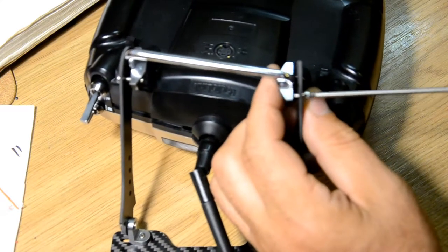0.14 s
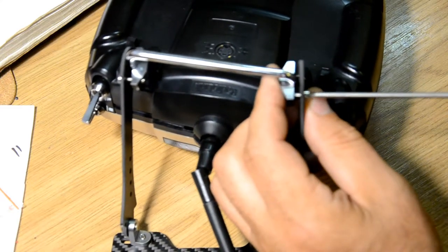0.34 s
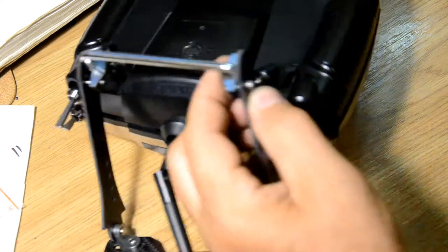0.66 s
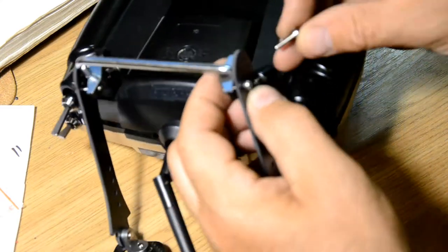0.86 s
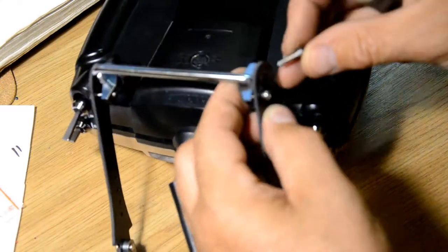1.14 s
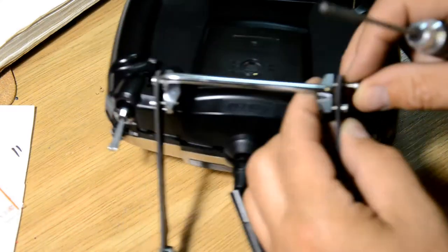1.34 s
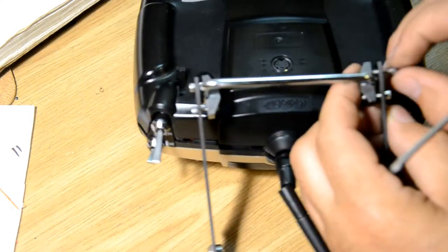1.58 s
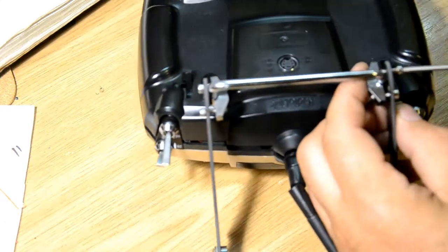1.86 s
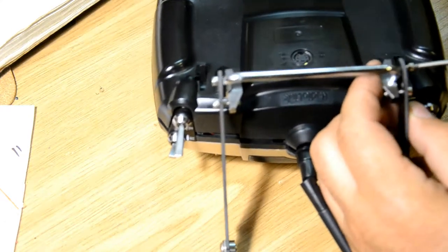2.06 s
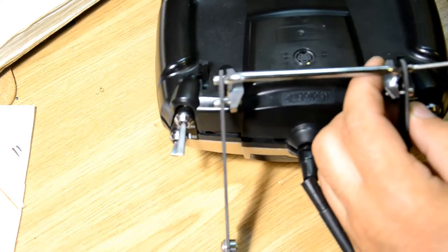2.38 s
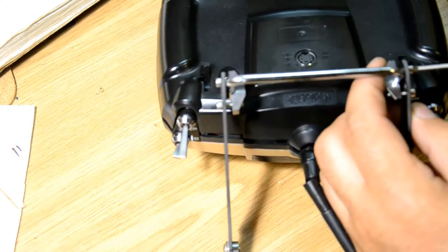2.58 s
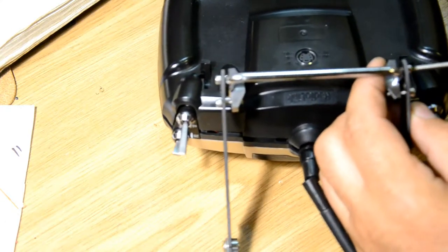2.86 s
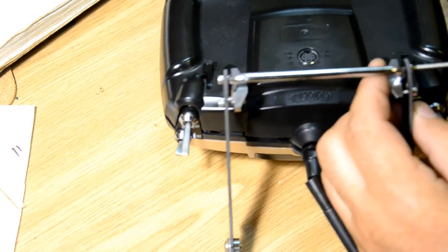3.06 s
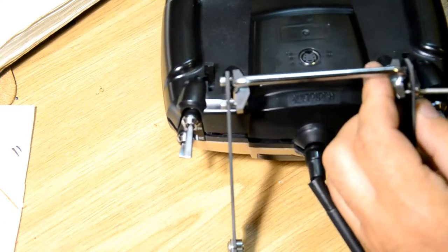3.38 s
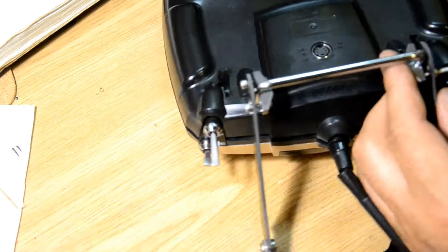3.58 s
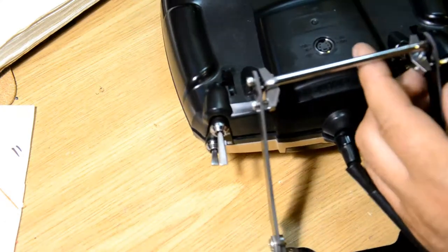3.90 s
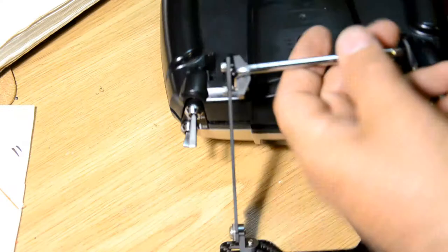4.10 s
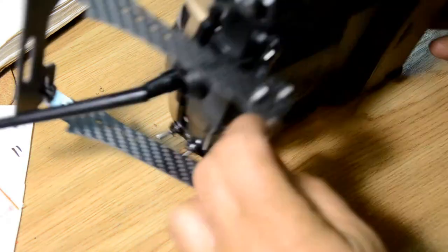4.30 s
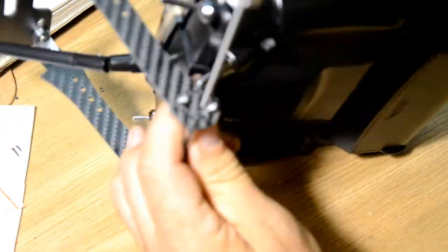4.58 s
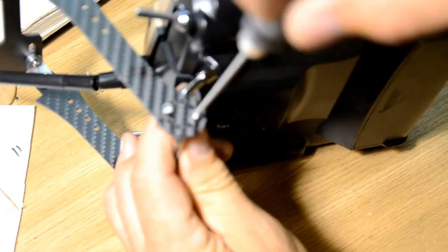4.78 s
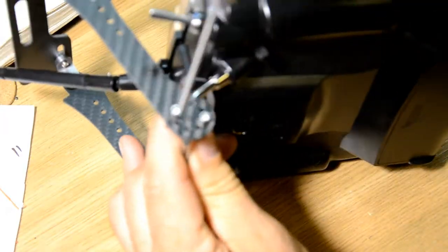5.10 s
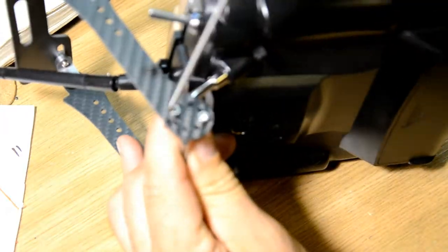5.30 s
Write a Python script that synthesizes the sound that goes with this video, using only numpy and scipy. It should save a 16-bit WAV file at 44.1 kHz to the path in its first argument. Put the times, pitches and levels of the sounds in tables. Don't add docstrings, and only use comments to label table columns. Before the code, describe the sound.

A dull airy room roar with a faint high whine flickers under fast-forwarded tinkering. Hollow plastic knocks, fingertip taps, tiny screw clicks and low desk thuds occur irregularly. After a near pause around three seconds, the case scrapes and bumps hard on the desk just past four, followed by small grazes and ticks, ending with a crisp metallic click. Small indoor space, near microphone, no echo.

```python
import sys
import numpy as np
from scipy import signal
from scipy.fft import rfft, irfft
from scipy.io import wavfile
from scipy.ndimage import uniform_filter1d

SR = 44100
rng = np.random.default_rng(int(sys.argv[2]) if len(sys.argv) > 2 else 0)


def ratio(d):
    e = np.asarray(d, float) / 20
    return 10 ** e


def bounce(signal):
    frames = np.transpose(np.atleast_2d(signal))
    limited = np.clip(frames, -1, 1)
    pcm = np.round(limited * 32767).astype(np.int16)
    wavfile.write(sys.argv[1], SR, pcm)


N = 240073
SLICE = 752

# start [s], level [dB], strongest ring [Hz],
# hardness as edge under level [dB], length [ms].
FIRM_KNOCKS = [(0.116, -34.5, 754, -48, 6), (0.183, -30.5, 783, -26, 9.4), (0.433, -32.5, 1290, -24, 9.2),
               (0.556, -35, 896, -50, 10.7), (1.332, -34.5, 993, -28, 16.3),
               (1.431, -28.5, 1008, -32.5, 12.4), (1.809, -36, 1063, -27.5, 9.2),
               (2.059, -35.5, 694, -33, 13), (2.322, -36, 936, -33, 8), (2.511, -38.5, 954, -36, 5.7),
               (3.5, -36.5, 665.4, -45, 6.34), (3.602, -33, 1750, -24, 8.9), (3.819, -39.5, 845, -34, 15.3),
               (3.943, -28.5, 803, -30, 11.3), (4.056, -36, 946, -37, 16), (4.073, -25, 1034, -45, 10.3),
               (4.107, -24, 610, -25.5, 20.5), (4.12, -15.5, 725, -28, 12.1), (4.143, -31, 924, -20, 8.8),
               (4.156, -46, 830, -11, 10), (4.269, -29, 1423, -26, 7.6), (5.184, -40, 960, -23, 7.3),
               (5.322, -32, 1100, -15.5, 13.7), (5.327, -39, 1036, -24, 8.12)]
# start [s], level [dB], strongest ring [Hz], hardness [dB].
FINGER_TAPS = [(0.315, -40, 970, -35), (0.368, -45, 990, -27), (0.598, -42, 1140, -37),
               (0.786, -42.5, 840, -35), (1.057, -50, 920, -25), (1.251, -44, 993, -41),
               (1.309, -41, 752, -28), (1.414, -44, 1030, -26), (1.633, -42.5, 520, -26),
               (1.848, -43.5, 943, -29), (1.992, -39, 740, -32), (2.019, -38, 982, -34),
               (2.18, -39.5, 1049, -26), (2.369, -43, 834, -29), (2.419, -38, 970, -36),
               (2.631, -47, 934, -41), (2.735, -47, 738, -22), (3.03, -40, 988, -30),
               (3.087, -36.5, 952, -36), (3.486, -44, 762, -44), (3.519, -57, 2400, -24),
               (3.643, -40, 920, -38), (3.768, -40.5, 735, -50), (3.926, -41.5, 990, -33),
               (4.474, -37, 700, -33), (4.525, -47, 1090, -24), (4.69, -39.5, 900, -23.5),
               (5.152, -42, 1010, -32), (5.221, -40.5, 810, -25.5), (5.419, -42, 854, -43)]
# start [s], level [dB], frequency [Hz], length [ms].
WALL_RINGS = [(0.181, -34.5, 786, 15), (0.181, -39, 1606, 14), (0.182, -48, 1280, 12), (0.43, -37, 847, 11),
              (0.431, -33, 1298, 12), (0.431, -35, 1726, 12.4), (1.309, -39, 755, 15),
              (1.427, -34.5, 559, 24), (1.428, -36.5, 1223, 15), (1.431, -35, 996, 13),
              (1.43, -39.5, 1804, 17.5), (3.818, -41.5, 1000, 15), (3.818, -40.5, 496, 16.4),
              (3.939, -27, 995, 17.6), (5.321, -31, 1282, 19), (5.32, -43, 693, 16), (5.32, -38, 820, 15),
              (5.323, -39, 1654, 20), (0.555, -36.5, 760, 9.1), (3.601, -41, 960, 14),
              (3.601, -38.5, 706, 9), (4.071, -28.5, 1098, 13), (4.116, -20.5, 710, 15.6),
              (4.143, -28, 860, 9.3)]
# frequency [Hz], width [Hz], level [dB].
CASE_MODES = [(543, 172, -1.5), (697, 38, 1), (960, 410, -4), (1315, 95, -1), (1650, 370, -7),
              (2040, 370, -18.5), (2210, 980, -17.5)]
# start [s], level [dB], tilt [dB per octave], length [ms].
METAL_TICKS = [(0.182, -48.5, -8, 14), (0.419, -52, 0, 18), (0.434, -36, -14, 4.9), (1.326, -43.5, -9, 31),
               (1.345, -47.5, -10, 17), (1.8045, -49, -3, 17), (2.176, -52.5, -11, 21), (2.24, -49, -23, 8),
               (2.7521, -53, -13, 9.9), (3.4241, -53, -16, 15), (3.942, -47, -9, 16), (4.068, -49, -9, 14),
               (4.1044, -44, -8, 8), (4.118, -37.5, -9, 20), (4.144, -44, -4, 8), (4.2666, -43.5, -16, 7.6),
               (4.469, -42, -13, 15), (4.6902, -33.5, -11, 10.7), (4.9137, -52, -1.5, 14),
               (5.015, -54, -9, 15), (5.218, -53, -5, 11), (5.3207, -23.5, 0, 7), (5.327, -18.5, -2, 4.7)]
# start [s], level [dB].
SCREW_CLICKS = [(0.321, -57), (0.7726, -61), (1.4326, -60), (1.4626, -57), (1.8582, -59), (1.9794, -57),
                (2.0544, -57), (2.1126, -56), (2.3062, -57), (2.37, -59), (2.4404, -59), (2.5336, -63),
                (2.6244, -58), (2.6703, -57), (2.815, -60.5), (3.0194, -60), (3.0844, -57), (3.1494, -58),
                (3.1802, -61), (3.4845, -61), (3.5344, -58), (4.5999, -59), (4.7711, -56), (4.807, -63),
                (4.8494, -59), (4.9501, -57), (5.18, -57)]
# frequency [Hz], width [Hz], level [dB].
STEEL_MODES = [(4950, 57, -17.5), (7420, 110, -21), (8480, 160, -17), (9180, 120, -13), (10300, 140, -20),
               (11700, 240, -20), (13200, 250, -21)]
# start [s], level [dB], frequency [Hz], length [ms].
STEEL_RINGS = [(0.424, -76, 5400, 12), (0.425, -74, 9650, 14), (1.853, -64, 3000, 28),
               (3.178, -69, 4800, 8), (3.18, -79, 5300, 20), (3.482, -63, 4800, 8),
               (3.601, -38.5, 1810, 6.1), (3.941, -64, 9700, 16), (3.942, -65, 10700, 16),
               (3.939, -58, 5262, 25), (3.942, -26.5, 1698, 14), (4.068, -59, 4700, 19),
               (4.068, -62, 5430, 12), (4.068, -68, 8550, 10), (4.265, -38, 1938, 14),
               (4.467, -58.5, 6800, 19), (4.468, -61, 5130, 13), (4.469, -68, 8120, 16),
               (4.68, -66, 5410, 19), (4.686, -55.5, 3210, 15), (4.687, -48, 2045, 20),
               (4.689, -55, 9350, 11), (4.689, -60, 10700, 12), (4.912, -77, 10300, 16),
               (5.01, -72, 5300, 32), (5.011, -60.5, 3120, 16), (5.012, -77, 9400, 24),
               (5.326, -44.5, 10200, 10), (5.3252, -41, 8000, 4.6), (5.3265, -34, 3200, 6.5)]
# start [s], level [dB], ring [Hz], deep push under 130 Hz [dB], length [ms].
DESK_THUDS = [(0.389, -49, 154, -54, 24), (0.55, -48, 206, -54, 17), (0.682, -42.5, 231.5, -66, 14),
              (1.139, -41.5, 145, -52, 20), (1.254, -45, 225, -67, 11), (1.332, -42.5, 238, -54, 16),
              (1.432, -45.5, 288, -66, 15), (1.462, -49, 149, -46.5, 15), (2.06, -46, 305.6, -60, 18),
              (2.319, -46.5, 233, -54, 9.8), (3.03, -47.5, 294, -62, 14), (3.087, -45, 266, -51, 11),
              (3.479, -45, 250, -66, 36), (3.944, -45, 275, -60, 30), (4.052, -40.5, 242, -65, 30),
              (4.073, -28.5, 227, -59, 15), (4.106, -34, 240, -37, 46), (4.121, -17.5, 250, -29.5, 13),
              (4.145, -34, 304, -64, 4.6), (4.171, -42, 244, -76, 22), (4.267, -31.5, 334, -35, 11.4),
              (4.519, -41, 238, -43.5, 8.5), (4.544, -46.5, 246, -48, 39), (4.934, -53, 257, -44.5, 24)]
# start [s], length [s],
# moment of most pressure [0-1], body [dB], grit over body [dB].
DRAG_STROKES = [
    (3.462, 0.051, 0.9, -55, -25),
    (3.509, 0.13, 0, -45, -22),
    (3.608, 0.029, 0.03, -39.5, -9.5),
    (4.04, 0.047, 0.8, -47.5, -17),
    (4.082, 0.03, 0.35, -46, -6),
    (4.129, 0.046, 0.12, -37, -3),
    (4.166, 0.17, 0.18, -47.5, -10),
]
# start [s], level [dB], centre [Hz], width [Hz], length [ms].
SLIPS = [(0.197, -42.5, 990, 400, 26), (0.235, -46, 990, 400, 9.9), (0.416, -59, 3000, 1500, 18),
         (0.441, -65, 2800, 1200, 22), (1.057, -50, 1100, 600, 8.8), (1.308, -73, 6460, 3000, 11),
         (1.355, -61, 2980, 1200, 9), (1.445, -60, 2800, 1200, 14), (1.863, -53, 1900, 1200, 6.7),
         (2.049, -56, 2450, 1200, 14), (2.063, -39, 1200, 900, 8.5), (2.325, -56, 1800, 900, 6.9),
         (2.511, -49, 1490, 1500, 7.5), (2.631, -51.5, 1780, 700, 7), (3.014, -60.5, 2830, 1400, 16),
         (3.029, -40, 1340, 1000, 5.9), (3.179, -70, 4200, 1500, 8), (3.519, -48, 2190, 1800, 4.5),
         (3.533, -61, 2400, 1800, 4.7), (3.557, -59, 2500, 1600, 6.9), (3.602, -46, 800, 400, 11),
         (3.612, -74, 4470, 1500, 10), (3.768, -47, 800, 500, 5.4), (3.9433, -30.5, 1680, 1010, 6.2),
         (3.953, -39.5, 1500, 1200, 7.7), (3.94, -62, 9300, 900, 17), (4.068, -57, 4970, 1500, 7.8),
         (4.11, -57, 8000, 8000, 6), (4.123, -26, 1600, 900, 6.9), (4.135, -51, 3800, 2500, 11),
         (4.1445, -33, 1400, 700, 6.2), (4.158, -47, 2600, 1200, 5.4), (4.188, -56, 2200, 1600, 9.5),
         (4.2, -48, 2200, 1600, 7.9), (4.216, -57, 2200, 1600, 7), (4.232, -56, 2500, 1300, 9.8),
         (4.597, -78, 10000, 3000, 10), (4.872, -62.5, 2770, 1200, 9.1), (5.184, -41, 970, 500, 7.3),
         (5.327, -30, 1130, 400, 5.5)]
# start [s], level [dB], centre [Hz], width [Hz], length [ms].
FAINT_GRAZES = [(0.257, -81, 8000, 7000, 10), (0.32, -53, 1700, 700, 9.1), (0.372, -55, 1690, 700, 18),
                (0.458, -76, 4500, 1500, 8), (0.555, -43, 820, 300, 12), (0.775, -88, 7900, 7000, 8),
                (1.311, -51, 800, 400, 7.7), (1.407, -84, 11500, 2500, 6), (1.57, -83, 8000, 7000, 9.2),
                (1.68, -83, 8000, 7000, 10), (2.02, -46, 1300, 1100, 9.3), (2.16, -87, 8000, 7000, 8),
                (2.35, -79, 8000, 7000, 8), (2.535, -80, 10000, 7000, 8), (2.735, -50, 1400, 1000, 4.5),
                (2.795, -84, 8000, 7000, 8), (2.815, -72, 5000, 2000, 7), (3.5, -50, 2000, 1500, 7.5),
                (3.618, -48, 1800, 1800, 9.8), (3.643, -46, 1100, 1200, 6.5), (3.968, -58, 2600, 1200, 6.3),
                (4.054, -55.5, 3420, 700, 11), (4.183, -79, 9000, 7000, 30), (4.268, -55, 1500, 1400, 7.4),
                (4.29, -79, 11000, 3000, 12), (4.374, -81, 9000, 6000, 9), (4.458, -58, 2800, 1200, 8.9),
                (4.502, -60, 1800, 700, 8.5), (4.52, -57, 2400, 1500, 8), (4.61, -62, 2800, 1200, 8),
                (4.628, -55, 1900, 900, 8), (4.646, -53.5, 1900, 900, 14), (4.668, -44.5, 1100, 600, 15),
                (4.88, -46, 1140, 400, 38), (4.991, -45.5, 1100, 400, 21), (5.03, -52, 1800, 900, 12),
                (5.206, -78, 6000, 6000, 8), (5.255, -65, 2000, 2000, 7), (5.315, -60, 3000, 3000, 6),
                (5.332, -48, 9500, 7000, 3.5)]
# start [s], level [dB], centre [Hz], width [Hz], length [ms].
LOOSE_RATTLES = [
    (3.086, -45.5, 1300, 1410, 6.1),
    (3.499, -39.5, 680, 120, 8.1),
    (4.069, -63, 5400, 1200, 14),
    (4.469, -61, 4930, 900, 15),
    (4.68, -76, 10500, 5000, 9),
    (5.326, -46, 4550, 1800, 8.8),
]
# frequency [Hz], density [dB per Hz].
ROOM_SPECTRUM = [(25, -7.5), (70, -6), (255, -5), (350, -14), (560, -11.5), (680, -11.5), (960, -8),
                 (2280, -19), (2540, -22.5), (3610, -28.5), (5560, -40.5), (9000, -46.5), (13000, -49.5),
                 (15800, -53)]
# frequency [Hz], width [Hz], height [dB].
ROOM_HUMPS = [(126.6, 20, 13.5), (242, 102, 5), (3570, 120, 8.5), (4720, 65, 4.5)]
# time [s], frequency [Hz].
ROAR_CENTRE = [(0, 800), (0.2, 950), (0.4, 1140), (0.55, 760), (2.5, 895), (4.2, 950), (4.5, 1330),
               (4.95, 1200), (5.44, 1120)]
# time [s], level over its usual value [dB].
TRAFFIC_SWELL = [(0.0, 2.5), (0.18, 3), (0.35, 6), (0.86, 3.5), (1.03, 1.5), (1.32, 1), (1.51, 0.8),
                 (2.05, 0.5), (2.36, 0), (3.01, 1), (3.56, -0.2), (3.89, 0.1), (4.12, 3.5), (4.26, 1.5),
                 (4.76, 4), (5.06, 3), (5.44, 3)]


def evened(x):
    return x / np.sqrt(np.mean(x ** 2) + 1e-20)


def add(mix, s, sound):
    part = mix[max(round(s * SR), 0):][:len(sound)]
    part += sound[:len(part)]


def hump(hz, centre_hz, width_hz):
    return 1 / np.sqrt(1 + (2 * (hz - centre_hz) / width_hz) ** 2)


def low_pass(hz, corner_hz, order):
    return 1 / (1 + (hz / corner_hz) ** order)


def high_pass(hz, corner_hz, order):
    return 1 / (1 + (corner_hz / (hz + 1)) ** order)


def burst(colour, db, rise_ms, length_ms, fall_db):
    noise = irfft(colour * np.exp(2j * np.pi * rng.random(len(colour))))
    ms = np.arange(len(noise)) * 1000 / SR
    rise, length = np.clip(rise_ms, .3, 20), np.clip(length_ms, 4, 40)
    fade_in = np.sin(np.pi / 2 * np.clip(ms / rise, 0, 1)) ** 2
    decay = ratio(-fall_db * np.clip(ms - rise, 0, None) / length)
    fade_out = np.cos(np.pi / 2 * np.clip((ms - rise - 0.13 * length) / (1.2 * length), 0, 1)) ** 1.6
    shape = fade_in * decay * fade_out
    lumps = evened(np.convolve(rng.standard_normal(len(noise)), np.hanning(160), "same"))
    sound = noise * shape * ratio(1.5 * lumps)
    return ratio(db) * sound * np.sqrt(np.sum(shape ** 2) / np.sum(sound ** 2))


def rings(table):
    twin_share, twin_apart = 0.1, 0.04
    out = np.zeros(N)
    for s, db, ring_hz, length in table:
        t = np.arange(round(length * SR / 1000)) / SR
        fade = np.sin(np.pi * (t / t[-1]) ** 0.84) ** 1.97
        turns = ring_hz * t + rng.random()
        mode = np.sin(2 * np.pi * turns)
        twin = np.sin(2 * np.pi * (turns + twin_apart * ring_hz * t))
        add(out, s, ratio(db) * fade * (mode + twin_share * twin))
    return out


def case_colour(hz):
    return np.sqrt(sum((ratio(db) * hump(hz, f, w) ** 2) ** 2 for f, w, db in CASE_MODES))


def knocks():
    usual_hard_db, tap_ms, clear_hz = -30, 13, 14
    depth_per_soft, dull_per_soft, ring_per_soft = 0.27, 0.39, 0.22
    out, hz = np.zeros(N), np.fft.rfftfreq(4096, 1 / SR)
    body, edge = case_colour(hz), hump(hz, 3140, 2400) ** 3
    for s, db, ring_hz, hard_db, length in FIRM_KNOCKS + [(*row, tap_ms) for row in FINGER_TAPS]:
        soft = usual_hard_db - hard_db
        depth_db = depth_per_soft * soft * low_pass(hz, 720, 8)
        dull_db = dull_per_soft * soft * high_pass(hz, 1300, 6)
        rise = .7 * length
        sound = burst(hump(hz, ring_hz, clear_hz) ** 2, db - 14 + ring_per_soft * soft, rise, length, 6.7)
        sound += burst(body * ratio(depth_db - dull_db), db - 8.5, rise, length, 1.7)
        sound += burst(edge, db + hard_db, rise, length, 0.89)
        add(out, s - .58 * rise / 1000, sound)
    return out + rings(WALL_RINGS)


def ticks():
    click_tilt_db, click_ms = -7.5, 18
    tick_sizzle_db, click_sizzle_db = -1, 3
    out, hz = np.zeros(N), np.fft.rfftfreq(4096, 1 / SR)
    clear = [(*row, tick_sizzle_db) for row in METAL_TICKS]
    faint = [(*row, click_tilt_db, click_ms, click_sizzle_db) for row in SCREW_CLICKS]
    for s, db, tilt_db, length, sizzle_db in clear + faint:
        rise = 0.29 * length
        fizz = ratio(tilt_db * np.log2((hz + 1) / 8000)) * high_pass(hz, 4300, 8)
        fizz *= np.where(hz > 13000, ratio(sizzle_db - 0.14 * (db + 43)), 1)
        steel = sum(ratio(level + 3.5 * rng.standard_normal()) * hump(hz, f, w) ** 2
                    for f, w, level in STEEL_MODES)
        add(out, s - 0.42 * rise / 1000, burst(fizz * (1 + 10.0 * steel), db - 19.0, rise, length, 7.2))
    return out + rings(STEEL_RINGS)


def thuds():
    rise = 7.83
    out, hz = np.zeros(N), np.fft.rfftfreq(4096, 1 / SR)
    push_colour = hump(hz, 90.5, 40) ** 2 * high_pass(hz, 60, 6)
    for s, db, ring_hz, deep_db, length in DESK_THUDS:
        boom = burst(hump(hz, ring_hz, 30) ** 2, db - 2.5, rise, length, 18.0)
        push = burst(push_colour, deep_db - 2.0, 1.48 * rise, length, 7.0)
        add(out, s - rise / 2000, boom + push)
    return out


def drags():
    start_db, end_db, grit_swing = -1.5, -18.5, 1.07
    count, slips_per_s = 8192, 3500
    out, hz = np.zeros(N), np.fft.rfftfreq(count, 1 / SR)
    grit_colour = hump(hz, 2650, 1500) ** 3 * low_pass(hz, 3500, 4)
    for s, length, top, body_db, grit_db in DRAG_STROKES:
        share = np.linspace(0, 1, round(length * SR))
        press_db = np.interp(share, [0, np.clip(top, .02, .98), 1], [start_db, 0, end_db])
        force = ratio(3.3 * np.minimum(rng.exponential(1, count), 4)) * rng.choice([-1, 1], count)
        slips = rfft(force * (rng.random(count) < slips_per_s / SR))
        grit = evened(irfft(slips * grit_colour))[:len(share)]
        body = evened(irfft(slips * case_colour(hz)))[:len(share)]
        sound = grit * ratio(grit_db + grit_swing * press_db) + body * ratio(press_db - 3.0)
        add(out, s, ratio(body_db) * sound * signal.windows.tukey(len(share), .25))
    return out


def snaps():
    out, hz = np.zeros(N), np.fft.rfftfreq(4096, 1 / SR)
    for table, rise in [(SLIPS, 0.12), (FAINT_GRAZES, 0.46), (LOOSE_RATTLES, 0.12)]:
        for s, db, centre_hz, width_hz, length in table:
            add(out, s, burst(hump(hz, centre_hz, width_hz) ** 3, db, rise * length, length, 7.5))
    return out


def room_level(hz, t, flicker):
    f, level_db = np.transpose(ROOM_SPECTRUM)
    db = np.interp(np.log(hz + 1), np.log(f + 1), level_db)
    db = db + sum(height * hump(hz, c, w) ** 2 for c, w, height in ROOM_HUMPS)
    swell = np.interp(t, *np.transpose(TRAFFIC_SWELL))
    rustle, hum, scrape = 2 + swell, -2.5 + 0.041 * swell, -5.5 + 0.16 * swell
    low, high, top = low_pass(hz, 400, 6), high_pass(hz, 2500, 6), low_pass(hz, 6000, 4)
    db = db + low * hum + (1 - low) * (1 - high) * rustle + high * top * scrape
    roar_hz = np.interp(t, *np.transpose(ROAR_CENTRE))
    db = db + (2.0 + 0.54 * swell) * hump(hz, roar_hz, 510) ** 2
    db = db + 15.5 * hump(t, 2.02, 0.29) * hump(hz, 53, 25) ** 2
    return db + (.5 + .7 * top) * flicker[:, :1] + .5 * high * top * flicker[:, 1:]


def whine(flicker):
    whine_hz, whine_db, flicker_db = 15703, -84, 2.5
    turns = whine_hz * np.arange(2 * SLICE) / SR + rng.random((len(flicker), 1))
    return ratio(whine_db + flicker_db * flicker[:, 1:]) * np.sin(2 * np.pi * turns)


def air():
    frames, hz = N // SLICE + 3, np.fft.rfftfreq(2 * SLICE, 1 / SR)
    t = np.arange(frames)[:, None] * SLICE / SR
    flicker = np.clip(rng.standard_normal((frames, 2)), -2, 2)
    a, b, patches = rng.standard_normal((3, frames, len(hz)))
    db = room_level(hz, t, flicker) + 1.3 * evened(uniform_filter1d(patches, size=15, axis=1))
    slices = evened(irfft((a + 1j * b) * ratio(db), axis=1)) * ratio(-49.5)
    fade = np.sin(np.pi * np.arange(2 * SLICE) / (2 * SLICE)) ** 1.9
    slices = (slices + whine(flicker)) * fade
    return (slices[1:, :SLICE] + slices[:-1, SLICE:]).ravel()[:N]


def scene():
    return (knocks() + ticks() + thuds() + drags() + snaps() + air())[None]


def roll_off(x):
    return signal.sosfilt(signal.butter(12, 16110, fs=SR, output="sos"), x)


def record(dry):
    gap_low_hz, gap_high_hz, edge_hz = 12850, 15000, 15860
    hz, t, z = signal.stft(dry, SR, nperseg=1024)
    gap = (hz > gap_low_hz) & (hz < gap_high_hz)
    below = (hz > 9000) & (hz < gap_low_hz)
    power = uniform_filter1d((abs(z[:, below]) ** 2).mean(1), size=3)
    over_db = 10 * np.log10(power / np.median(power))
    open_hz = gap_low_hz + 700 * np.ceil(np.clip((over_db - 1.6) / 2.5, 0, 4))
    z[:, gap] *= hz[gap, None] < open_hz[:, None]
    z[:, hz > edge_hz] = 0
    gated = signal.istft(z, SR, nperseg=1024)[1][:, :N]
    return roll_off(gated + .0006)


dry = scene()
out = record(dry)
bounce(out)
```